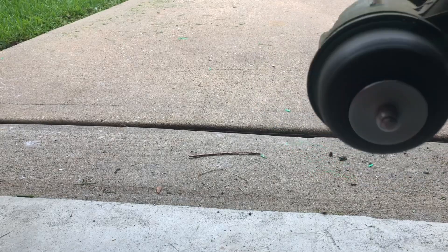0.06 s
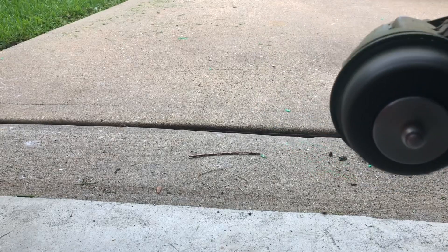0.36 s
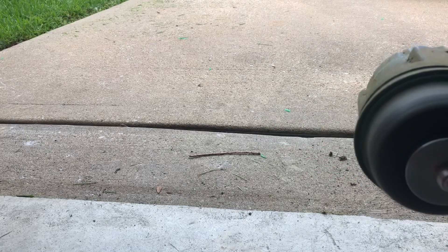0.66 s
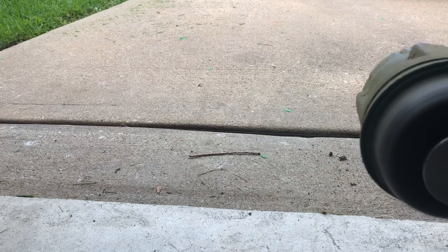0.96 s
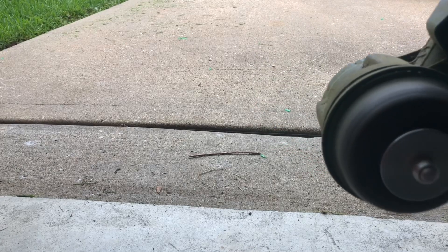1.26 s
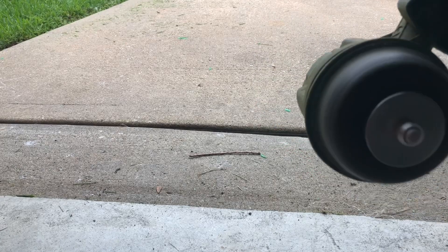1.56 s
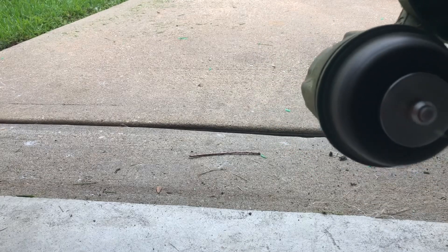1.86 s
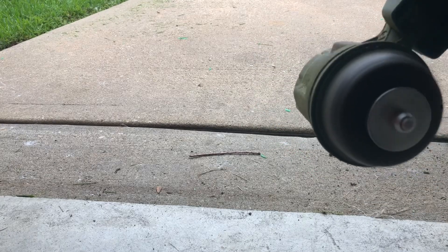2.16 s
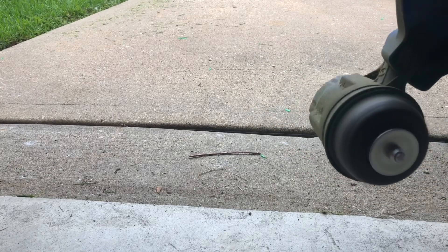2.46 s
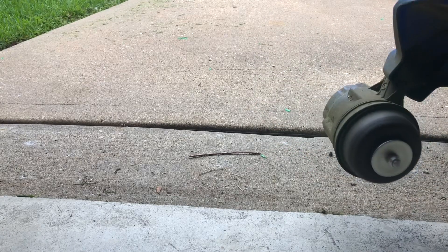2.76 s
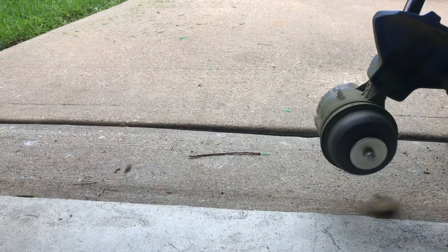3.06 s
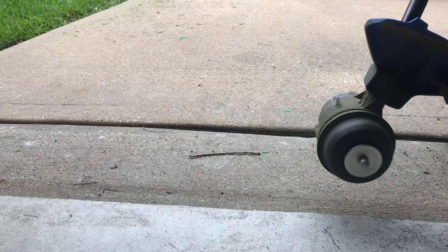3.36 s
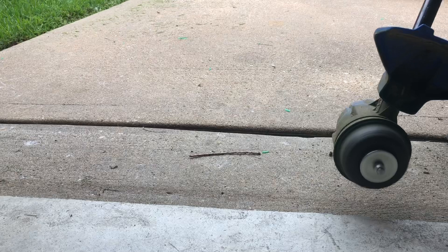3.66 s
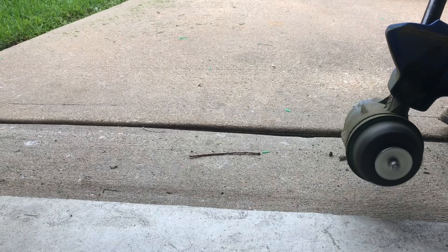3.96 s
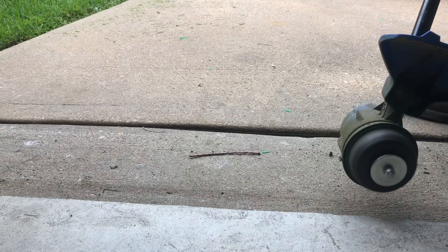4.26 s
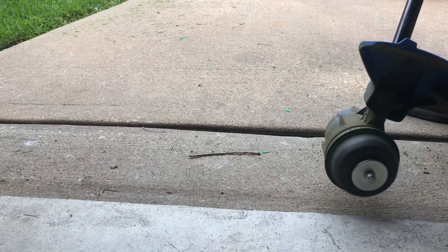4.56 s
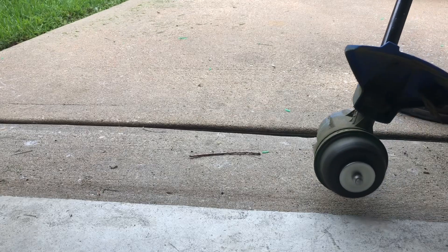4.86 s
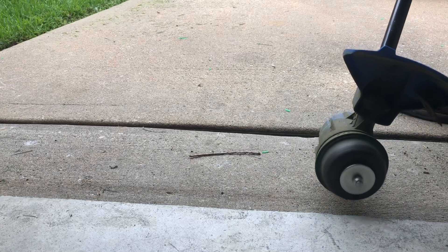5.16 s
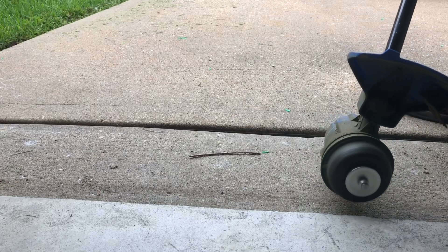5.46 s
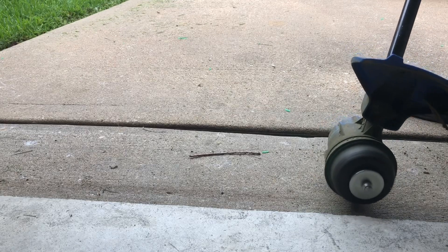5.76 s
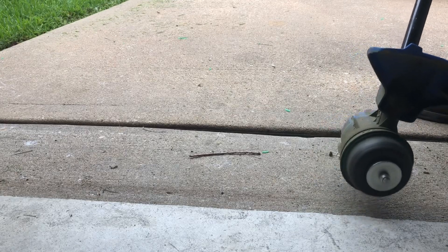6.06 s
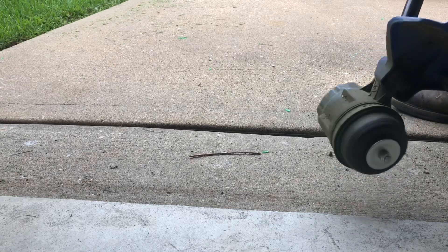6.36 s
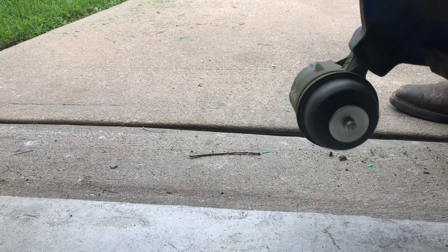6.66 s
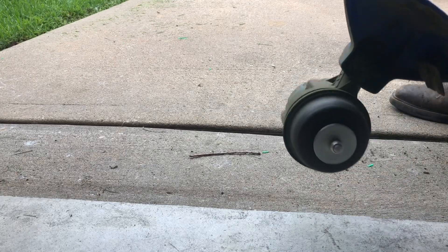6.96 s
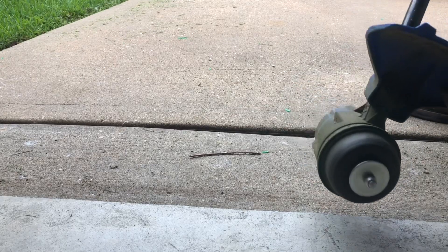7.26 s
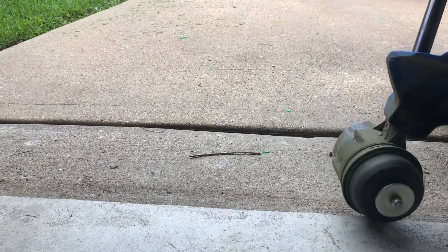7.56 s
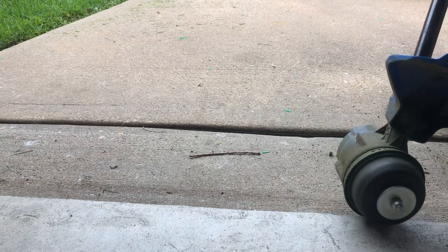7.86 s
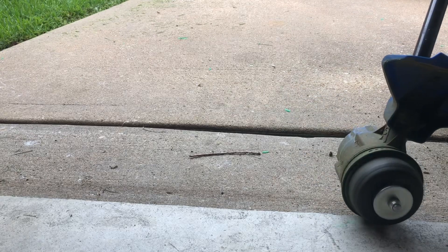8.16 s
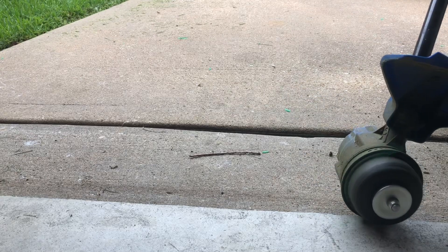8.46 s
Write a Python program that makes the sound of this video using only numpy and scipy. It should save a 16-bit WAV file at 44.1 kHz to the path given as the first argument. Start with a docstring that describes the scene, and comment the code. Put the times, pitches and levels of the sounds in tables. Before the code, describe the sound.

A cordless string trimmer starts abruptly close to the microphone and climbs to a steady motor whine, with a low hum and a high whistling hiss from its spinning lines. The lines then touch concrete, buzzing, rasping and flicking grit. The motor cuts out and the whistle falls away as the head coasts, rattling and ending in light separate ticks. Faint outdoor noise lies underneath.

```python
"""A cordless string trimmer spins up, is lowered until its two lines scrape a concrete edge, coasts down.
The lines hum at their passing rate and whistle as they shed vortices; on the concrete each pass
slaps, rasps and throws grit. Motor and gears whine, the housing rattles, and the slowing line
ends in single ticks. Faint outdoor noise lies underneath."""
import sys
import numpy as np
from scipy import signal
from scipy.fft import rfft, irfft, next_fast_len
from scipy.io import wavfile
from scipy.ndimage import map_coordinates

SR = 44100
rng = np.random.default_rng(int(sys.argv[2]) if len(sys.argv) > 2 else 0)


def unload_wav(signal):
    """Save mono or channel-first audio to the path in sys.argv[1] as 16-bit WAV at rate SR, clipped to [-1, 1]."""
    wavfile.write(
        sys.argv[1],
        SR,
        np.round(np.clip(np.atleast_2d(signal).T, -1, 1) * 32767).astype(np.int16),
    )


N = 384993
TIME_S = np.arange(N) / SR

# Speed once run up, sagging under load, then coasting. Each row: time in seconds, line passes in Hz.
PASS_RATE = [(1.87, 279.2), (2.65, 281), (2.95, 272.6), (3.26, 274.9), (3.77, 261.8), (4.18, 265.3),
             (4.55, 254), (5.13, 257.6), (5.54, 251.8), (5.87, 281.4), (5.97, 280.5), (6.14, 252.7),
             (6.42, 219.5), (7.07, 159.2), (7.54, 125.5), (8.14, 77.3), (8.73, 42.5)]

# Noise spectra. Each row: frequency in Hz, relative level in dB.
WHISTLE_SPECTRUM = [(3000, -24), (4500, -19), (6000, -12), (7000, -6), (7900, 1), (8500, -0.5), (9400, -6),
                    (10500, -17.5), (12500, -22), (20000, -24.5)]
HISS_SPECTRUM = [(3000, -11.5), (5500, -16.5), (7500, 3.5), (10200, 6), (12200, -0.5), (14000, 0.5),
                 (16000, -4.5)]
RASP_SPECTRUM = [(190, -36), (260, -16.5), (480, 2), (650, -7), (850, -4.5), (1300, 1), (1700, 0.5),
                 (2200, 3.5), (2850, 2.5), (3500, 5), (4500, 6), (6000, 0), (9000, -10)]
DUST_SPECTRUM = [(8000, -30), (11500, -1), (13000, 1), (14800, 0), (16000, -5)]
AIR_SPECTRUM = [(30, -29), (70, -18), (130, -14), (260, -1), (480, -2.5), (640, -1.5), (900, 1.5),
                (1400, 2), (2200, 2), (2850, -22), (3800, 3.5), (7000, -5), (12000, -12), (16000, -4.5)]
TICK_SPECTRUM = [(530, -57), (900, -33), (1160, -28), (2140, -7), (2450, -10), (2860, -15), (3590, -1),
                 (4630, -5.5), (5890, -15), (8050, -8.5), (12000, -13.5), (14700, -7), (16000, -14)]
OUTDOOR_SPECTRUM = [(25, -26), (60, -5), (140, -3), (300, -15), (800, -1), (3000, 5), (15000, -28)]

# Partials. Each row: multiple of the head's turning rate, relative level in dB.
HUM_PARTIALS = [(1, -42), (2, 2.5), (3, -27.5), (4, -4), (5, -42), (6, -16), (8, -29)]
SLAP_PARTIALS = [(4, -9), (6, 5), (8, 10), (10, 12), (12, 13), (14, -6), (16, -4.5), (18, 6), (20, -28)]
FLAP_PARTIALS = [(1, -44), (3, -1), (4, 2), (5, -9), (6, 0), (8, -5.5), (10, -2.5), (14, 1.5), (18, -25)]
MOTOR_PARTIALS = [(8.6, -11.5), (10, -13), (12, -13.5), (14, -6.5), (16, 2), (18, -0.5), (20, 3), (22, -3),
                  (24, -7.5), (26, -5), (28, -3)]
GEAR_PARTIALS = [(3.9, -6), (7.7, -5.5), (11.8, 0.5), (15.2, 1.5), (16.8, 5), (19.4, 3)]

# Bent lines unfurl or trail. Each row: centre and spread in seconds, level in dB.
BENT_SWISHES = [(.15, 0.043, -15), (7.47, .13, -26.5)]
# Tips skim the concrete. Each row: start, end and release in seconds, hiss and dust in relative dB.
TIP_GRAZES = [(2.716, 2.942, 0.033, -23, -19), (3.028, 3.08, 0.037, -18, -25),
              (3.144, 3.285, 0.021, -28, -18), (3.28, 4.33, .06, -33.5, -17.5),
              (5.654, 6.016, 0.077, -21, -21.5)]
# Lines slap the edge. Each row: start, end and release in seconds, level in dB, roughness from 0 to 1.
EDGE_BUZZES = [(2.74, 2.857, .02, -38, 0.25), (2.855, 2.936, 0.0089, -30, .6),
               (3.21, 3.46, 0.023, -38.5, 0), (3.44, 4.217, 0.085, -30, 0), (5.705, 6.02, 0.14, -39.5, 0.7)]
# Lines grind flat. Each row: start, end and release in seconds, rasp, hiss and flap in relative dB.
FLAT_GRINDS = [(4.22, 5.027, 0.024, -28.5, -19.5, -35), (5.01, 5.614, 0.064, -25.5, -19, -35),
               (7.247, 7.832, 0.55, -30, -31, -45.5)]
# Larger flung grains. Each row: time in seconds, relative peak in dB.
STONE_HITS = [(4.5547, -8), (4.5816, -2), (4.6257, -2), (4.6717, 3), (4.712, -4), (4.7969, -2), (4.8374, 0),
              (4.851, 0), (5.342, -4), (5.364, -5)]
# Force curve of the last strikes. Each row: time in seconds, relative peak in dB.
TICK_FORCE = [(8.23, -20), (8.31, -22.5), (8.44, -22.5), (8.51, -18), (8.63, -23), (8.72, -27.5)]
# Housing resonances. Each row: centre and width in Hz, weights for gears and for knocks in dB.
HOUSING_MODES = [(442, 73, 4.5, -1.5), (788, 96, 9, 4), (1154, 122, 5, -9), (2100, 160, -18, 3)]
# Housing rattle, strongest at low speed. Each row: line passes in Hz, level in dB.
RATTLE_BY_SPEED = [(43, -38.5), (75, -34.5), (105, -31), (140, -33.5), (185, -50.5), (280, -45.5)]
# Rings at start-up and first bite. Each row: centre and spread in seconds, pitch and width in Hz,
# level in dB.
LOAD_RINGS = [(0.081, 0.023, 796, 25.8, -25), (2.883, 0.032, 1087, 43.2, -31),
              (2.908, 0.035, 1256, 60, -34)]

RUN_UP_S, JOLT_S, FLING_AT_S, FLING_S = 0.15, 0.1, 0.024, 0.1
TRIGGER_OFF_S, DROP_S = 5.97, 0.1
BACK_AT_S, BACK_S, BACK_DB = 2.62, 0.42, -6  # the motor is drawn away from the listener


def whistle(beat, run_up, coast, load, hiss, full_hz=8193, onset_hz=3900, wear_db_per_s=-4):
    """Two unequal lines shed vortices: bands that slide with tip speed and fade as the tips wear."""
    # without drive the pitch soon drops and the upper band fades
    drop_at_s = TRIGGER_OFF_S + 0.06
    pitch_hz = full_hz * (run_up * coast) ** 0.74 * (1 - 0.28 * ramp(drop_at_s, DROP_S))
    upper_gain = run_up * undb(-46 * np.maximum(TIME_S - drop_at_s, 0))
    position = np.cumsum(pitch_hz / 8150)
    spectra = [np.array(WHISTLE_SPECTRUM) * [ratio, 1] for ratio in (1, 1.211)]
    lower, upper = (map_coordinates(colour(noise(), s), [position], mode="wrap") for s in spectra)
    band = (lower + upper_gain * upper) / np.hypot(1, upper_gain)
    gain = undb(-10.5 + wear_db_per_s * np.cumsum(load) / SR)
    flutter = unit(undb(walk(400) + 0.59 * walk(45)))
    chop_depth = np.clip(0.086 + 0.79 * hiss / gain, 0, 0.7)  # deeper on the ground
    chop = 1 - chop_depth + 0.15 * chop_depth * beat
    return band * flutter * chop * gain / np.sqrt(1 + (onset_hz / pitch_hz) ** 16)


def lines(turns, swing, buzz, flap, hum_db=-32, choke_db=-8, free_slap_db=-47):
    """Two lines hum in the air, buzz on the edge and flap when bent."""
    hum = partials(turns, HUM_PARTIALS, waver_db=0.5, waver_hz=12, wobble_rad=0.21)
    # on rough contact the hits come unevenly and one line lags
    roughness = sum(row[4] * touch(*row[:3]) for row in EDGE_BUZZES)
    uneven_turns = turns + roughness * (0.011 * walk(110) + 0.046 * np.sin(2 * np.pi * turns))
    slap = partials(uneven_turns, SLAP_PARTIALS, waver_db=1.5, waver_hz=9, wobble_rad=0.067)
    flapping = partials(turns, FLAP_PARTIALS, waver_db=1, waver_hz=14, wobble_rad=0.1)
    hum_gain = swing * undb(hum_db + choke_db * buzz / buzz.max())
    slap_gain = buzz + swing * undb(free_slap_db)
    return hum * hum_gain + slap * slap_gain + flapping * (flap + buzz * undb(-8))


def swishes(beat, centre_hz=4570, width_hz=1500):
    """A bent line meets the air broadside and swishes below the whistle, throbbing with each pass."""
    band = unit(resonance(resonance(noise(), centre_hz, width_hz), centre_hz, width_hz))
    gain = sum(undb(db) * bell(at_s, spread_s) for at_s, spread_s, db in BENT_SWISHES)
    return band * unit(1 + 0.38 * beat) * gain


def scrape(drag, hiss, rasp, dust):
    """Each pass drags a tip over concrete: sandy hiss, lower rasp, fine dust, flying grit."""
    hissing = colour(drag * (noise() + 0.5 * grit(rate_hz=440, spread_db=4.2)), HISS_SPECTRUM)
    rasping = colour(drag * (noise() + 0.36 * grit(rate_hz=300, spread_db=6.5)), RASP_SPECTRUM)
    spray = colour(drag * (noise() + 0.4 * grit(rate_hz=700, spread_db=1.7)), DUST_SPECTRUM)
    stones = colour(noise(), HISS_SPECTRUM) * bursts(STONE_HITS, rise_s=0.00005, fall_s=0.00022)
    grip_db = 0.82 * walk(22)  # tips catch and slip
    return (hissing * hiss * undb(2.5) + rasping * rasp * undb(4 + grip_db)
            + spray * dust + stones * undb(-12))


def ticks(first_s=8.228, rate_hz=36.3, brake_hz_per_s=31.9, count=15, swell_s=0.0017):
    """One line brushes the concrete once a turn as the head brakes evenly: a swish, a faint tail."""
    slowed_hz = np.sqrt(rate_hz ** 2 - 2 * brake_hz_per_s * np.arange(count))
    times_s = first_s + (rate_hz - slowed_hz) / brake_hz_per_s
    hits = list(zip(times_s, np.interp(times_s, *np.transpose(TICK_FORCE))))
    swish = sum(undb(db) * bell(at_s, swell_s) for at_s, db in hits)
    tail = undb(-12) * bursts(hits, rise_s=0.002, fall_s=0.0046)
    return colour(noise(), TICK_SPECTRUM) * (swish + tail) * undb(-0.5)


def motor(turns, power, level_db=-31):
    """The motor whines under power."""
    whine = partials(turns, MOTOR_PARTIALS, waver_db=2.5, waver_hz=22, wobble_rad=0.077)
    return whine * power * undb(level_db)


def gears(turns, power, coast, load, jolt, driven_db=-34.5, load_db=-14, coast_db=-36.5, jolt_db=-40):
    """Gears chatter through the housing, most when unloaded."""
    mesh = partials(turns, GEAR_PARTIALS, waver_db=3, waver_hz=30, wobble_rad=0.67)
    housed = sum(undb(db) * resonance(mesh, hz, width_hz) for hz, width_hz, db, _ in HOUSING_MODES)
    driven = power * undb(driven_db + load_db * load)
    freewheeling = ramp(TRIGGER_OFF_S, 0.58) ** 2 * coast * undb(coast_db)
    return unit(housed) * (driven + freewheeling + jolt * undb(jolt_db))


def rattle(turns, drag, pass_hz, jolt, jolt_db=-34):
    """One hard knock mid-pass, with loose chatter around it, rings the housing."""
    mid_pass = np.diff(np.floor(2 * turns + 0.5), prepend=0)
    knocks = unit(mid_pass * drag) + noise() * drag
    housed = sum(undb(db) * unit(resonance(knocks, hz, width_hz))
                 for hz, width_hz, _, db in HOUSING_MODES)
    level_db = np.interp(pass_hz, *np.transpose(RATTLE_BY_SPEED))
    return unit(housed) * np.hypot(undb(level_db), jolt * undb(jolt_db))


def rings():
    """Sudden loads briefly ring the housing and guard."""
    out = 0
    for at_s, spread_s, hz, width_hz, db in LOAD_RINGS:
        tone = np.sqrt(2) * np.sin(2 * np.pi * hz * TIME_S + walk(2 * width_hz))
        out += tone * undb(db) * bell(at_s, spread_s)
    return out


def air(extension, coast, jolt, rasp, steady_db=-35.5, jolt_db=-25, rasp_db=-10.5):
    """Turbulence around the head, stronger as the lines fling out and where they drag."""
    spin_gain = extension * np.hypot(undb(steady_db) * coast ** 0.43, jolt * undb(jolt_db))
    gain = np.hypot(spin_gain, rasp * undb(rasp_db))
    return colour(noise(), AIR_SPECTRUM) * gain * undb(2 * walk(35))


def shudder(turns, turn_hz, shaft_hz=96, width_hz=11.2, peak_db=-44.5):
    """The unbalanced head shakes the flexible shaft, most when sweeping through its resonance."""
    detuning = (turn_hz / shaft_hz - shaft_hz / turn_hz) * shaft_hz / width_hz
    shake = np.sqrt(2) * np.sin(2 * np.pi * turns) / np.hypot(1, detuning)
    return shake * undb(peak_db + 2.1 * walk(21))


def outdoors(level_db=-44):
    """Steady background noise."""
    return undb(level_db) * colour(noise(), OUTDOOR_SPECTRUM)


def motion():
    """Pass rate, share of the run-up reached, share of speed left after the trigger is let go."""
    running_hz = np.interp(TIME_S, *np.transpose(PASS_RATE))
    run_up = 1 - np.exp(-((TIME_S + 1 / SR) / RUN_UP_S) ** 0.93)
    release_hz = np.interp(TRIGGER_OFF_S, TIME_S, running_hz)
    coast = np.where(TIME_S > TRIGGER_OFF_S, running_hz / release_hz, 1)
    return running_hz * run_up, run_up, coast


def strikes(turns, width_passes, scatter_db=2.5, worn_db=-2.5):
    """One bump per line pass, each of random size; the shorter line hits softer."""
    passes = 2 * turns
    index = passes.astype(int)
    size = undb(scatter_db * noise()[index] + worn_db * (index % 2))
    return unit(size * np.exp(-0.5 * ((passes % 1 - 0.5) / width_passes) ** 2))


def contact():
    """All touches summed: load from 0 to 1, then gains of hiss, rasp, dust, buzz and flap."""
    skim, dust = touches(TIP_GRAZES)
    (buzz,) = touches([row[:4] for row in EDGE_BUZZES])
    grind, hiss, flap = touches(FLAT_GRINDS)
    load = np.minimum(sum(touch(*row[:3]) for row in TIP_GRAZES + FLAT_GRINDS), 1)
    rasp = np.hypot(grind, np.hypot(buzz * undb(-4), skim * undb(-17)))
    return load, np.hypot(hiss, skim), rasp, dust, buzz, flap


def touch(start_s, end_s, release_s):
    """Envelope of one touch of the concrete: bite, hold, release."""
    bite_s = 0.031 + 0.48 * release_s
    return ramp(start_s, bite_s) * np.exp(-np.maximum(TIME_S - end_s, 0) / release_s)


def touches(table):
    """Gain over time for each level column."""
    return sum(np.outer(undb(row[3:]), touch(*row[:3])) for row in table)


def partials(turns, orders, waver_db, waver_hz, wobble_rad):
    """Tones locked to the rotation, wavering in level and phase; rms 1."""
    out = 0
    for order, db in orders:
        # order ** 2 spreads the phases of the partials, so peaks stay low and layers on the same orders add
        # alike
        phase = 2 * np.pi * order * turns + order ** 2 + wobble_rad * walk(waver_hz)
        out += undb(db + waver_db * walk(waver_hz)) * np.sin(phase)
    return unit(out)


def grit(rate_hz, spread_db):
    """Sparse clicks, mostly small; rms 1."""
    size = undb(spread_db * np.minimum(rng.exponential(size=N), np.pi))
    return unit((rng.random(N) < rate_hz / SR) * size * np.sign(noise()))


def colour(x, spectrum):
    """Filter by (Hz, dB) points, rolling off below the first; rms 1."""
    hz, db = np.transpose(spectrum)
    size = 2 * next_fast_len(N // 2 + 1)
    bins_hz = np.maximum(np.fft.rfftfreq(size, 1 / SR), 1)
    gain = undb(np.interp(np.log(bins_hz), np.log(hz), db)) * np.minimum(bins_hz / hz[0], 1) ** 2
    return unit(irfft(rfft(x, size) * gain)[:N])


def resonance(x, hz, width_hz):
    """Band-pass, gain 1 at its centre."""
    return signal.lfilter(*signal.iirpeak(hz, hz / width_hz, SR), x)


def bursts(hits, rise_s, fall_s):
    """Envelope of short (seconds, dB) events."""
    out = 0
    for at_s, db in hits:
        decay = np.maximum((at_s - TIME_S) / rise_s, (TIME_S - at_s) / fall_s)
        out += undb(db) * np.exp(-np.minimum(decay, 20))
    return out


def bell(at_s, spread_s):
    """Gaussian envelope, peak 1."""
    return np.exp(-0.5 * ((TIME_S - at_s) / spread_s) ** 2)


def ramp(start_s, length_s):
    """Linear rise from 0 to 1."""
    return np.clip((TIME_S - start_s) / length_s, 0, 1)


def walk(rate_hz):
    """Smooth random wander; rms 1."""
    knots = rng.standard_normal(int(N / SR * rate_hz) + 4)
    return unit(signal.resample(knots, next_fast_len(N))[:N])


def noise():
    """White noise."""
    return rng.standard_normal(N)


def undb(db):
    """Decibels to gain."""
    return 10 ** (np.asarray(db) / 20)


def unit(x):
    """Scale to rms 1."""
    return x / np.sqrt(np.mean(x ** 2))


def scene():
    """One rotation drives lines, motor and gears; both channels alike."""
    pass_hz, run_up, coast = motion()
    load, hiss, rasp, dust, buzz, flap = contact()
    turns = np.cumsum(pass_hz / 2 * (1 + 0.00068 * walk(25))) / SR
    jolt = TIME_S / JOLT_S * np.exp(1 - TIME_S / JOLT_S)  # starting torque
    extension = ramp(FLING_AT_S, FLING_S)  # the lines fling out
    nearness = undb(BACK_DB * ramp(BACK_AT_S, BACK_S))
    power = nearness * run_up ** 3.3 * (1 - ramp(TRIGGER_OFF_S, DROP_S))
    beat = strikes(turns, width_passes=0.17 * (pass_hz / pass_hz.max()) ** 0.43)
    drag = unit(beat + 1.08)  # tips never quite leave the ground
    sag_hz = pass_hz.max() - pass_hz / (run_up * coast)
    swing = extension * coast ** 2.5 * undb(-0.29 * sag_hz)  # the hum fades with lost speed
    mix = extension * whistle(beat, run_up, coast, load, hiss)
    mix += lines(turns, swing, buzz, flap) + air(extension, coast, jolt, rasp)
    mix += motor(turns, power) + gears(turns, power, coast, load, jolt)
    mix += rattle(turns, drag, pass_hz, jolt) + shudder(turns, pass_hz / 2) + rings()
    mix += scrape(drag, hiss, rasp, dust) + ticks() + outdoors()
    mix += extension * swishes(beat)
    return np.tile(mix, (2, 1))


def record(dry, ceiling=1.66, top_hz=15850):
    """Microphone dip in the upper middle, rounded peaks, steep low-pass."""
    dipped = dry - 0.63 * resonance(dry, hz=2835, width_hz=1040)
    rounded = ceiling * np.tanh(dipped / ceiling)
    return signal.sosfilt(signal.ellip(12, 0.2, 80, top_hz, fs=SR, output="sos"), rounded)


dry = scene()
out = record(dry)
unload_wav(out)
```